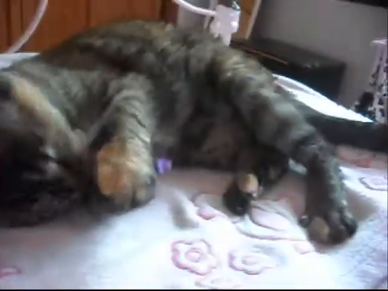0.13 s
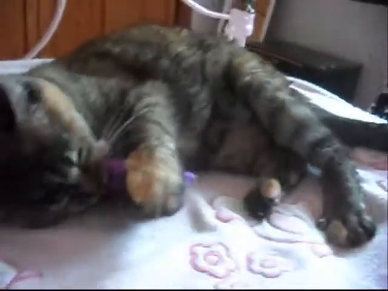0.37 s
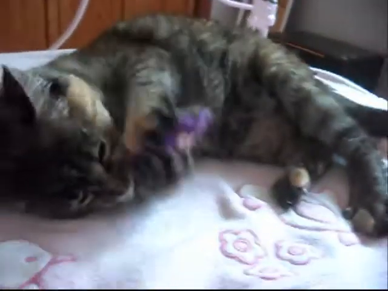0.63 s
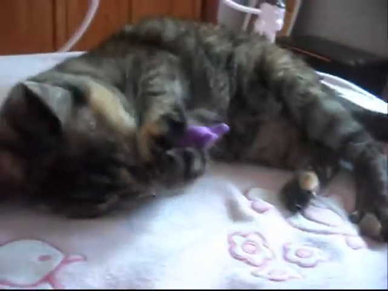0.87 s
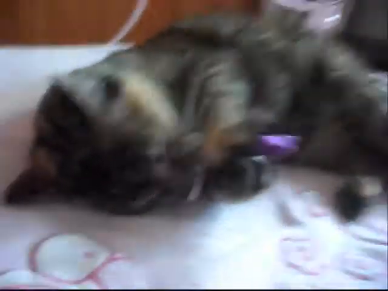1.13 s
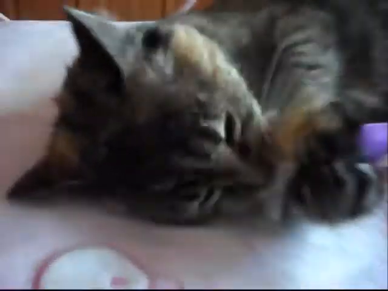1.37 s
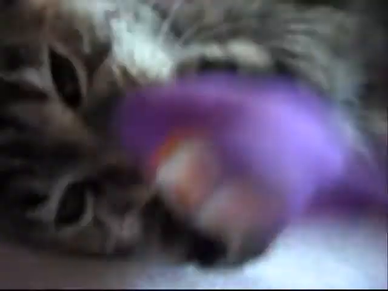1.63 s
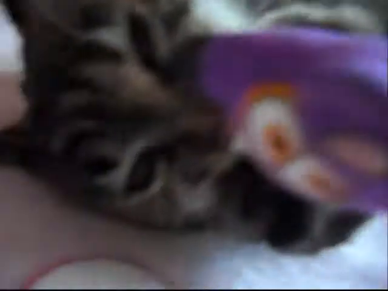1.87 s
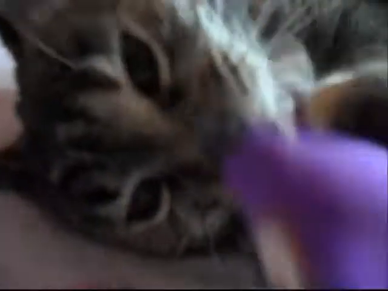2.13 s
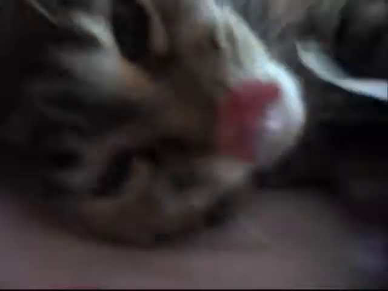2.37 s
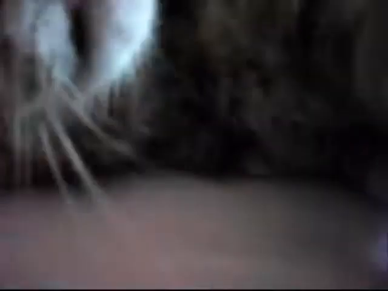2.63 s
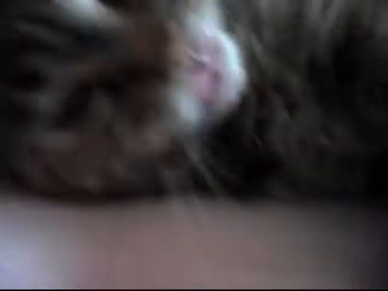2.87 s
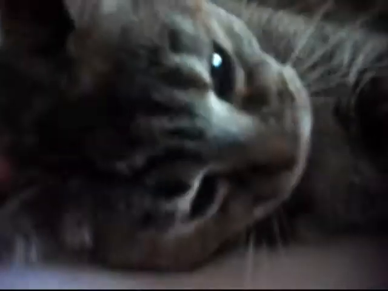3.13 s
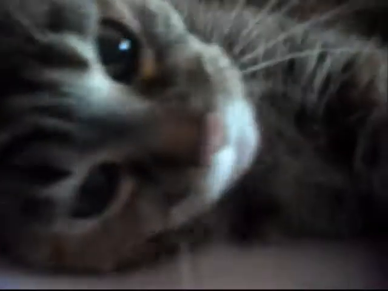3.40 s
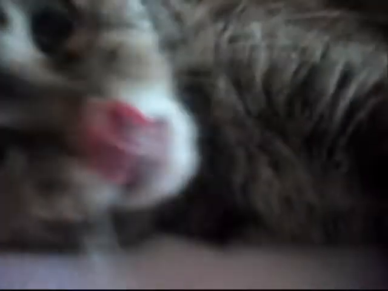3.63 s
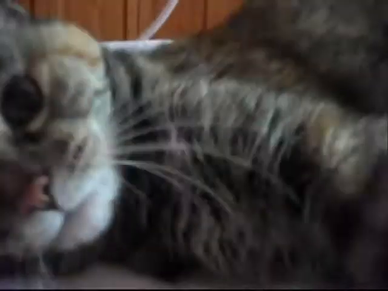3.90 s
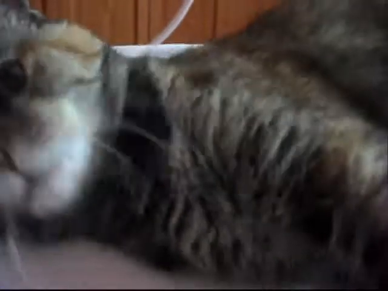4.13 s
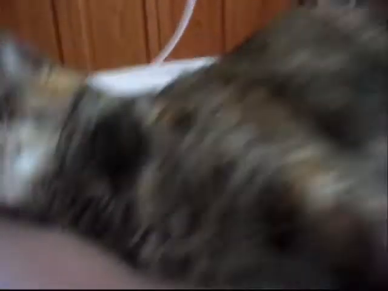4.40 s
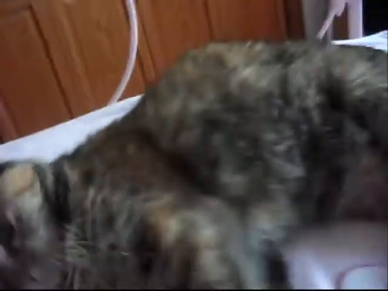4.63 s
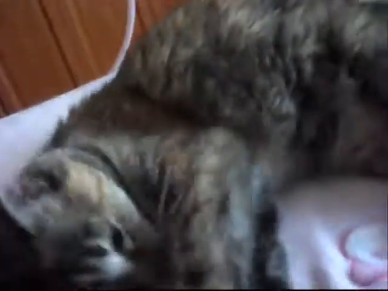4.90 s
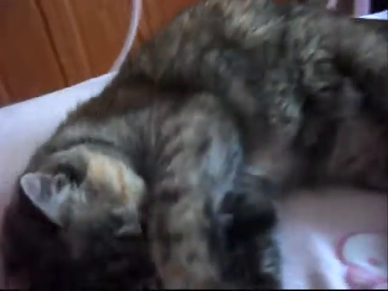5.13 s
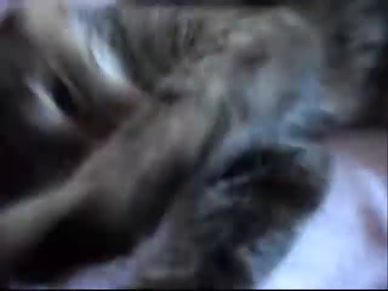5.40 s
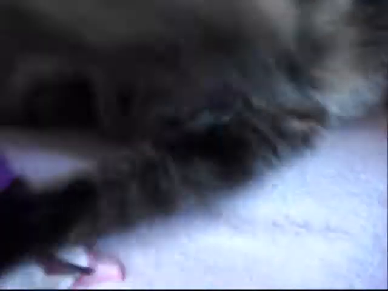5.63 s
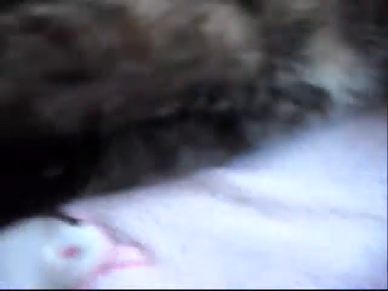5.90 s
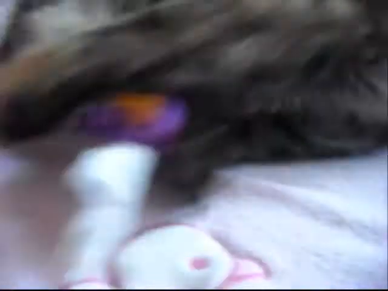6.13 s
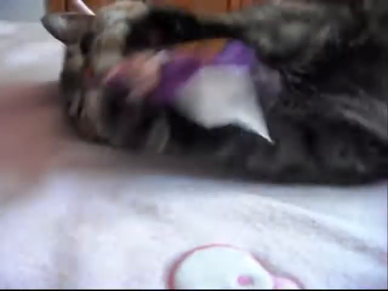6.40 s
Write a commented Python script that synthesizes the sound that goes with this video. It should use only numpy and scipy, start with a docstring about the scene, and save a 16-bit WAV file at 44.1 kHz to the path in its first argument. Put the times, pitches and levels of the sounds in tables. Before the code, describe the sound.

A quiet room with faint low hum, soft hiss and a barely audible thin whine, heard through a close handheld mono microphone. At 0-0.2 s there is a small rustle, light knocks and handling rumble. From 0.2 s a cat purrs nearby, about 22-31 soft throaty pulses a second, alternating every third to half second between cleaner in-breaths and looser, airier out-breaths, with short dips between. It begins light and raspy, grows fuller from about 1.2 s, is strong around 2.3-2.5 s, nearly fades at 3.1-3.3 s, then returns strongly at 3.4 s and continues to 6.5 s. Deep hand bumps swell near 0.5, 1.0, 1.6, 2.1 and 5.6 s. Brief brushes come near 0.75, 2.3-2.5 and 4.8 s, tiny knocks near 1.5, 2.2, 2.9, 3.8-4.0 and 6.0 s, with a faint tick at 3.8 s. At 6.35-6.4 s a quick scrape and knock meet a sharp bright click and weaker second tick.

```python
"""First a low rumble of a hand on a camera, over faint hum and hiss, with a rustle and small knocks.
Then a cat on a blanket purrs close by while it plays with a small toy. Its throat folds clap about
26 times a second, with opposite sign on in- and out-breath; a snap and puffs of air join each clap.
Rumble, hiss, fur rustle and breath are shaped noise; claps, knocks and ticks are short damped swings."""
import sys
import numpy as np
from scipy import signal
from scipy.fft import rfft, irfft
from scipy.io import wavfile
from scipy.ndimage import uniform_filter1d

SR = 44100
rng = np.random.default_rng(int(sys.argv[2]) if len(sys.argv) > 2 else 0)


def master(y):
    """Save y as 16-bit WAV."""
    cut = np.clip(np.atleast_2d(y).T, -1, 1)
    pcm = np.round(cut * 32767)  # scale
    wavfile.write(sys.argv[1], SR, pcm.astype(np.int16))


def gain_from_decibels(decibels):
    """Convert decibel values to linear amplitude factors."""
    exponent = np.asarray(decibels, float) / 20
    return 10 ** exponent


N = 287532


def add(mix, start_s, sound):
    """Mixes a sound in at start_s seconds."""
    part = mix[max(round(start_s * SR), 0):][:len(sound)]
    part += sound[:len(part)]


def noise(spectrum):
    """Noise of rms 1; the spectrum gives its relative level at each pitch."""
    pitch_hz, level_db = np.transpose(spectrum)
    hz = np.fft.rfftfreq(N, 1 / SR)
    shape_db = np.interp(np.log(hz + 1), np.log(pitch_hz + 1), level_db)
    x = irfft(rfft(rng.standard_normal(N)) * gain_from_decibels(shape_db), N)
    return x / x.std()


def ring(t, pitch_hz, decay_s):
    """A damped swing that starts at its negative peak at t = 0."""
    return -np.exp(-np.abs(t) / decay_s) * np.cos(2 * np.pi * pitch_hz * t) * (t >= 0)


# room hum below, microphone hiss above: pitch_hz, relative level_db (per Hz)
HUM_AND_HISS = [(24, -39), (40, -12), (70, -6.5), (149, -8), (176, -15), (262, -17), (363, -23), (418, -25),
                (685, -24), (866, -26), (1260, -27), (7330, -33.5), (10900, -36), (14200, -59),
                (22000, -120)]


def hum_and_hiss():
    """Steady shaped noise: hum of the room and hiss of the microphone."""
    return gain_from_decibels(-50.5) * noise(HUM_AND_HISS)


# thin tones of the electronics: pitch_hz, level_db (rms)
WHINE_TONES = [(7140, -76), (7853, -83)]


def whines():
    """Thin steady tones whose phase wavers slowly, all together."""
    t = np.arange(N) / SR
    waver = 0.43 * noise([(1, 7), (4, 2), (12, -8), (100, -78)])  # radians
    return sum(np.sqrt(2) * gain_from_decibels(level_db) * np.sin(2 * np.pi * pitch_hz * t + waver)
               for pitch_hz, level_db in WHINE_TONES)


# the hand shifts on the case: middle_s, half_length_s, level_db (gain at the top of the swell)
HAND_SHIFTS = [(0.02, 0.19, -43), (0.486, .11, -32.5), (0.735, 0.12, -47), (1.025, 0.088, -32.5),
               (1.288, 0.057, -42.5), (1.57, 0.1, -33.5), (2.08, 0.07, -31.5), (2.334, 0.026, -40),
               (2.63, 0.15, -37.5), (2.868, 0.035, -46), (3.12, 0.096, -42.5), (3.54, 0.4, -46.5),
               (4.87, 0.049, -37.5), (5.062, 0.045, -40), (5.28, .1, -47), (5.58, 0.03, -28),
               (5.8, 0.12, -38), (6.145, 0.088, -37)]
# colour of the rumble: pitch_hz, relative level_db (per Hz)
RUMBLE_SPECTRUM = [(2, -26), (4, 0.5), (20, 3.5), (32, -12), (50, -20.5), (90, -62), (200, -103)]
STILL_HAND_DB = -50.5  # rumble gain between shifts


def handling():
    """The hand shakes the case: deep noise that rises and falls in slow swells."""
    t = np.arange(N) / SR
    shake = noise(RUMBLE_SPECTRUM)
    # even out the chance ups and downs of the noise, so the swells set the level
    power = uniform_filter1d(uniform_filter1d(shake ** 2, 5000), 5000)
    shake /= np.sqrt(power + 0.2)
    swells = gain_from_decibels(STILL_HAND_DB) + sum(gain_from_decibels(level_db) * np.exp(-((t - middle_s) / half_length_s) ** 2)
                                      for middle_s, half_length_s, level_db in HAND_SHIFTS)
    return swells * shake


# fur and toy brush the blanket: start_s, length_s, level_db (rms before the fades), pitch_hz, width_hz
BRUSHES = [(0.067, 0.043, -46, 316, 300), (0.087, 0.019, -56, 3080, 600), (0.131, 0.021, -56, 1010, 400),
           (0.711, 0.027, -59, 850, 350), (0.762, 0.042, -59.5, 910, 250), (0.866, 0.037, -58.5, 1000, 500),
           (2.258, 0.015, -54.5, 2330, 300), (2.454, 0.046, -52, 1170, 1300),
           (2.495, 0.046, -55.5, 840, 800), (6.349, 0.029, -53, 1890, 1425), (6.373, .007, -44, 6060, 6000),
           (0.432, .11, -63, 1100, 900), (4.75, 0.36, -63.5, 700, 800), (3.856, 0.19, -64, 1190, 1400),
           (5.515, 0.028, -59, 2800, 2000), (5.567, 0.025, -56.5, 4100, 1600),
           (5.602, 0.22, -67, 3380, 250)]


def rustles():
    """Each brush is grainy noise in one band of pitch."""
    out = np.zeros(N)
    for start_s, length_s, level_db, pitch_hz, width_hz in BRUSHES:
        size = round(length_s * SR)
        grain_db = 2.0 * np.repeat(rng.standard_normal(100), 200)  # a new strength every 200 samples
        grains = rng.standard_normal(20000) * gain_from_decibels(grain_db)
        edges_hz = [max(pitch_hz - width_hz / 2, 50), pitch_hz + width_hz / 2]
        band = signal.sosfilt(signal.butter(2, edges_hz, "band", fs=SR, output="sos"), grains)
        fades = signal.windows.tukey(size, .5)
        add(out, start_s, gain_from_decibels(level_db) * band[500:500 + size] / band.std() * fades)
    return out


# short knocks and creaks: start_s, level_db (before a 4 dB cut), pitch_hz, second_pitch_hz, length_ms
KNOCKS = [(0.067, -39, 410, 900, 7.6), (0.165, -40.5, 825, 1000, 9.5), (1.506, -37.5, 686, 870, 6.4),
          (2.171, -38, 930, 1210, 4.1), (2.866, -35, 417, 960, 2.5), (3.793, -39, 710, 900, 4.5),
          (3.896, -38.5, 664, 830, 5.4), (4.005, -36, 437, 620, 3.7), (4.606, -42, 690, 910, 9.4),
          (5.939, -35, 460, 880, 3.7), (6.033, -34, 330, 890, 4.4), (6.351, -29.5, 2230, 1530, 2.7),
          (6.362, -36, 1320, 2320, 4.4), (6.37, -32.5, 1240, 2480, 3.8), (6.469, -43, 500, 900, 5.4)]


def creaks():
    """A slip sets two modes ringing at once; they die within milliseconds."""
    out = np.zeros(N)
    for start_s, level_db, pitch_hz, second_pitch_hz, length_ms in KNOCKS:
        u = np.linspace(0, 1, round(np.clip(length_ms, 2, 40) * SR / 1000))
        t = np.arange(len(u)) / SR
        modes = np.sin(2 * np.pi * pitch_hz * t) + .7 * np.sin(2 * np.pi * second_pitch_hz * t)
        fade = np.minimum(8 * u, 1) * np.cos(np.pi / 2 * u)  # quick in, slow out
        add(out, start_s, gain_from_decibels(level_db - 4.0) * modes * fade)
    return out


# sharp ticks of claw or tooth on the toy, and wet licks: start_s, level_db, pitch_hz, length_cycles
TICK_EVENTS = [(3.7927, -34.5, 5180, 2.1), (6.3757, -18, 6940, 1.9), (6.399, -26.5, 7300, 2.2)]


def ticks():
    """A few cycles under a short bell curve, with a faint dull body and after-ring."""
    out = np.zeros(N)
    t = np.arange(-40, 300) / SR
    for start_s, level_db, pitch_hz, cycles in TICK_EVENTS:
        # the bell rises faster than it falls
        bell = np.exp(-(t * pitch_hz / cycles / np.where(t < 0, .45, .9)) ** 2)
        body = 0.072 * ring(t, 1520, 0.0011) + 0.088 * ring(t, 3500, 0.00046)
        after_ring = 0.17 * ring(t, 1.85 * pitch_hz, 0.00057)
        tick = bell * np.sin(2 * np.pi * pitch_hz * t) + body + after_ring
        add(out, start_s, gain_from_decibels(level_db) * tick)
    return out


def soften(x, cutoff_hz):
    """Rounds the edges off by taking out the treble."""
    return signal.sosfiltfilt(signal.butter(2, cutoff_hz, fs=SR, output="sos"), x)


def clap(inward, stretch):
    """Pressure builds, flips sign as the folds shut, and the chest swings out."""
    t = np.arange(-600, 1200) / SR / stretch  # the folds shut at t = 0
    if inward:
        build = 0.22 * (t < 0) * np.exp(-np.abs(t) / 0.0048)
        swing = ring(t, 142.0, 0.0038) + 0.29 * ring(t, 56, 0.0068)
        return soften(build + swing, 540)
    build = 0.61 * (t < 0) * np.exp(-np.abs(t) / 0.0022)
    swing = ring(t, 87, 0.0027) + 0.14 * ring(t, 58, 0.0057)
    return -soften(build + swing, 480)


# on an in-breath the upper ring of the snap climbs once the mouth opens beyond WIDE_OPEN_DB
SNAP_HZ, SNAP_RISE_HZ_PER_DB, WIDE_OPEN_DB = 907, 105, 1.5


def snap(inward, stretch, upper_hz):
    """A thinner pop as the folds part again; the higher its upper ring, the stronger that ring."""
    t = np.arange(-100, 600) / SR / stretch  # the folds part at t = 0
    share = .27 * (upper_hz / SNAP_HZ) ** 1.6
    pop = soften(ring(t, 330, .0011) + share * ring(t, upper_hz, .002), 1.4 * upper_hz)
    return pop if inward else -pop


# resonances (share above 0) and hollows (below 0): pitch_hz, width_hz, share
AIRWAY_BANDS = [(188, 144, 0.24), (274, 71, -0.39), (457, 114, 0.58), (620, 160, -0.38)]


def airway(x):
    """Throat and nose lift some bands and swallow others."""
    return x + sum(share * signal.lfilter(*signal.iirpeak(pitch_hz, pitch_hz / width_hz, SR), x)
                   for pitch_hz, width_hz, share in AIRWAY_BANDS)


# stretches of breath: start_s (first clap), end_s, start and end rate (claps per s), way (-1 in, +1 out)
BREATH_STRETCHES = [(0.204, 0.52, 23.1, 22.4, -1), (0.544, 0.96, 27.8, 26.1, 1),
                    (1.005, 1.45, 24.2, 26.5, -1), (1.478, 1.78, 31.3, 23.9, 1),
                    (1.825, 2.21, 22.0, 26.4, -1), (2.234, 2.4, 25.3, 25.6, -1),
                    (2.427, 2.72, 27.7, 28.4, 1), (2.749, 3.02, 29.4, 24.6, 1),
                    (3.066, 3.25, 25.6, 21.2, -1), (3.367, 3.62, 22.8, 27.5, -1),
                    (3.645, 4.09, 29.4, 26.7, 1), (4.106, 4.71, 24.0, 26.9, -1),
                    (4.742, 5.06, 27.6, 27.4, 1), (5.156, 5.45, 24.1, 25.4, -1),
                    (5.502, 5.92, 28.3, 25.5, 1), (5.955, 6.17, 21.5, 28.5, -1),
                    (6.193, 6.51, 27.2, 24.2, 1)]
# how hard and how open, joined by straight lines: time_s, effort_db (loudness of the voice),
# mouth_db (mouth opening, lifts snaps and rasp); fixed boosts are added to both below
EFFORT_CURVE = [(0.2, -57, 5.5), (0.3, -53, 6.5), (0.4, -55.5, 6.5), (0.5, -47, -15), (0.58, -59, -15),
                (0.82, -57, 5), (1.19, -67, -5), (1.25, -46, -8), (1.38, -55, -6), (1.61, -48.5, 2.5),
                (1.85, -48, -5), (2.12, -43, -5), (2.22, -50, -17), (2.28, -40.5, -8), (2.41, -50, -15),
                (2.54, -42.5, -11.5), (2.79, -45.5, -0.5), (2.9, -47.5, 1), (3.0, -48.5, -15),
                (3.09, -71, 3), (3.32, -66, 0), (3.36, -43.5, -14), (3.42, -43.5, -9), (3.55, -40.5, -2.5),
                (3.63, -51.5, -6), (3.76, -45, -3), (3.82, -47.5, -15), (3.98, -52.5, 1), (4.13, -53.5, -6),
                (4.2, -48, -5), (4.58, -48.5, -9), (4.72, -54.5, -2), (4.88, -51, 3), (5.05, -54.5, 5.5),
                (5.1, -65, 7), (5.2, -50.5, -10), (5.43, -47, -8), (5.55, -54.5, -8), (5.96, -52, -1.5),
                (6.08, -44.5, -21), (6.19, -56, -6), (6.5, -53, -1.5)]
# unsteady airflow in the chest: pitch_hz, relative level_db (per Hz)
CHEST_SPECTRUM = [(30, -28), (70, 0), (140, -13), (240, 0), (300, -18), (450, 5), (700, -39), (2000, -65)]
# rasp of the breath: pitch_hz, relative level_db (per Hz)
RASP_SPECTRUM = [(150, -34), (400, -0.5), (900, 0), (1500, -11.5), (2600, -12), (5000, -14), (11000, -30)]
# on the in-breath and on the out-breath: snap delay ms, looseness (0 clean - 1 flapping), pulse width
FOLDS_IN, FOLDS_OUT = (12.5, .13, 1), (13, .5, 1.03)
UNEVEN_DB = 5  # spread of clap strength if the folds were fully loose
USUAL_DB, WIDER_PER_DB = -50, 0.23  # claps of more effort than usual are wider and deeper, within limits
# rasp at usual effort on an in-breath, extra for the airier out-breath, and dB per dB of effort and mouth
RASP_DB, OUT_RASP_DB, RASP_FOLLOWS_EFFORT, RASP_FOLLOWS_MOUTH = -58, 1.5, 0.34, 0.35


def purr():
    """Every cycle: a clap, a snap of uneven strength, a loose flap of the folds and puffs of air."""
    claps, snaps, puffs, unsteady = np.zeros((4, N))
    time_s, effort, mouth = np.transpose(EFFORT_CURVE)
    puff = np.exp(-np.arange(1500) / SR / .005)
    for start_s, end_s, start_rate, end_rate, way in BREATH_STRETCHES:
        inward = way < 0
        delay_ms, loose, width = FOLDS_IN if inward else FOLDS_OUT
        t = np.arange(start_s, end_s, 1 / SR)
        turns = np.cumsum(np.interp(t, [start_s, end_s], [start_rate, end_rate])) / SR
        times = t[np.searchsorted(turns, np.arange(int(turns[-1]) + 1))]  # one clap each full turn
        for s, chance in zip(times, rng.standard_normal((len(times), 8))):
            late, clap_level, size, snap_late, snap_level, snap_size, flap_late, flap_level = chance
            s += .002 * loose * late
            parting = s + (delay_ms + 2 * loose * snap_late) / 1000
            effort_here = np.interp(s, time_s, effort)
            stretch = width * np.clip(1 + WIDER_PER_DB * (effort_here - USUAL_DB), .7, 1.4)
            wide_db = max(np.interp(s, time_s, mouth) - WIDE_OPEN_DB, 0)
            upper_hz = SNAP_HZ + inward * SNAP_RISE_HZ_PER_DB * wide_db
            one_clap = clap(inward, stretch * (1 + 0.085 * size))
            add(claps, s - 600 / SR, gain_from_decibels(UNEVEN_DB * loose * clap_level) * one_clap)
            one_snap = snap(inward, 1 + 0.16 * snap_size, upper_hz)
            add(snaps, parting - 100 / SR, gain_from_decibels(2 * snap_level) * one_snap)
            flap = 1.82 * loose * snap(inward, 1.3 + 0.06 * size, upper_hz)
            add(snaps, s + (5.51 + 2.516 * flap_late) / 1000, gain_from_decibels(2 * flap_level) * flap)
            add(puffs, s, 0.79 * puff)
            add(puffs, parting, puff)
            add(unsteady, s, loose * puff ** .5)  # the root dies away half as fast
    t = np.arange(N) / SR
    effort_db, mouth_db = np.interp(t, time_s, effort), np.interp(t, time_s, mouth)
    starts, ways = np.transpose(BREATH_STRETCHES)[[0, 4]]
    outward = ways[np.maximum(np.searchsorted(starts, t) - 1, 0)] > 0
    flutter = gain_from_decibels(-6) * unsteady * noise(CHEST_SPECTRUM)
    voice = gain_from_decibels(effort_db) * (gain_from_decibels(10.5) * claps + flutter + gain_from_decibels(11.0 + mouth_db) * snaps)
    rasp_db = RASP_DB + OUT_RASP_DB * outward
    rasp_db = rasp_db + RASP_FOLLOWS_EFFORT * (effort_db - USUAL_DB) + RASP_FOLLOWS_MOUTH * mouth_db
    airflow = .2 + puffs  # a little air always flows
    return airway(voice) + gain_from_decibels(rasp_db) * airflow * noise(RASP_SPECTRUM)


def scene():
    """All sources, one channel."""
    surroundings = hum_and_hiss() + whines() + handling()
    return (surroundings + rustles() + creaks() + ticks() + purr())[None]


def band_limit(x):
    """A steep low-pass at the top of the band."""
    return signal.sosfilt(signal.butter(12, 11080, fs=SR, output="sos"), x)


def record(dry):
    """The camera passes only what lies below its band limit of 10560 Hz."""
    low_pass = signal.firwin(301, 10560, window=("kaiser", 9), fs=SR)
    limited = signal.oaconvolve(dry, low_pass[None], "same")
    return band_limit(limited)


dry = scene()
out = record(dry)
master(out)
```